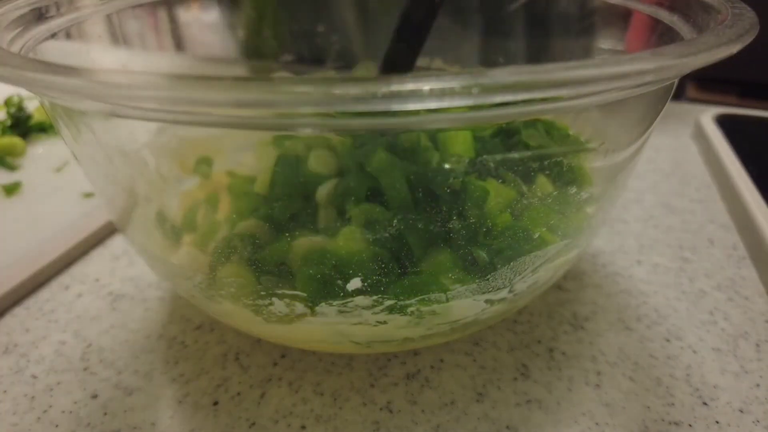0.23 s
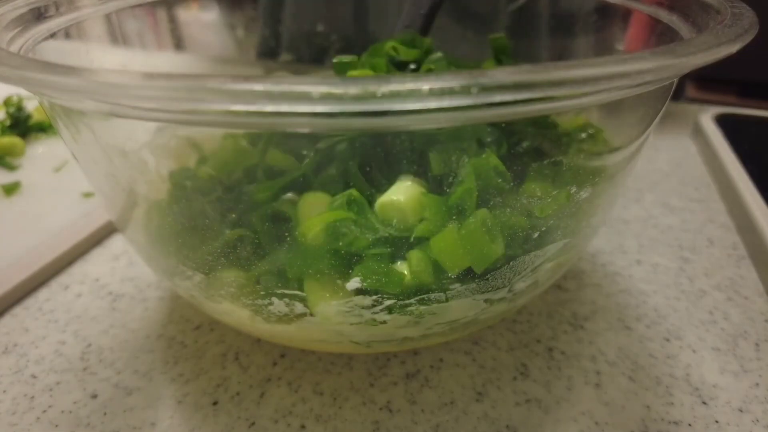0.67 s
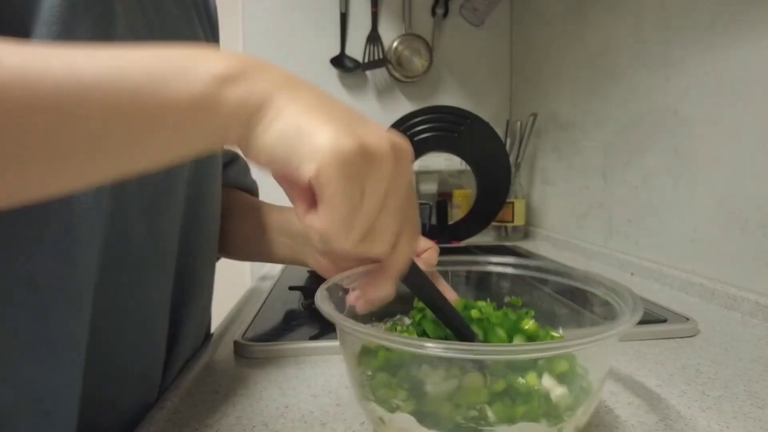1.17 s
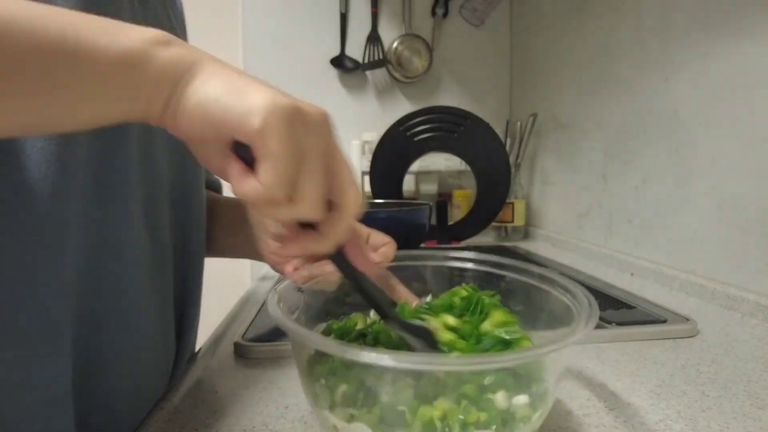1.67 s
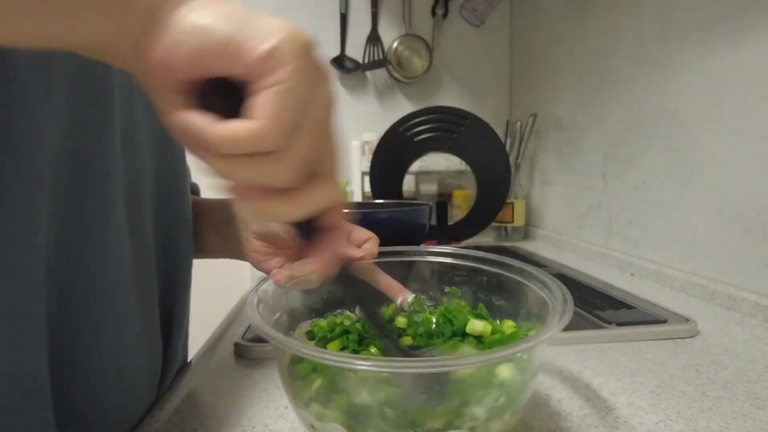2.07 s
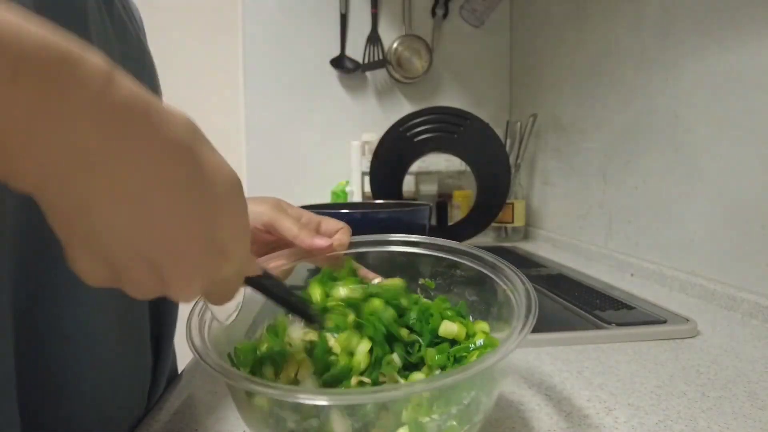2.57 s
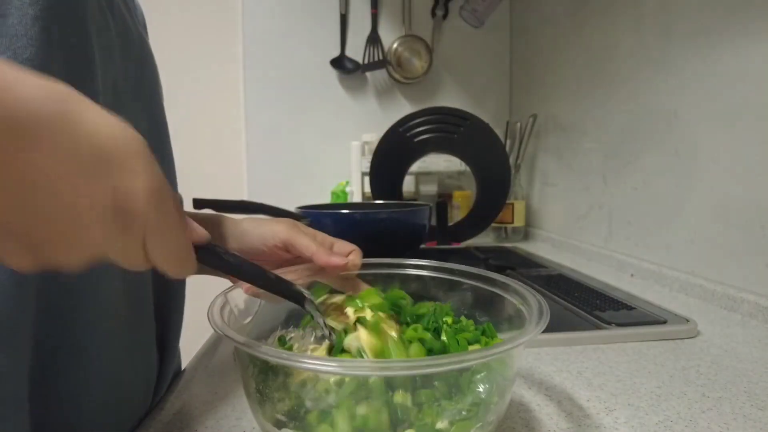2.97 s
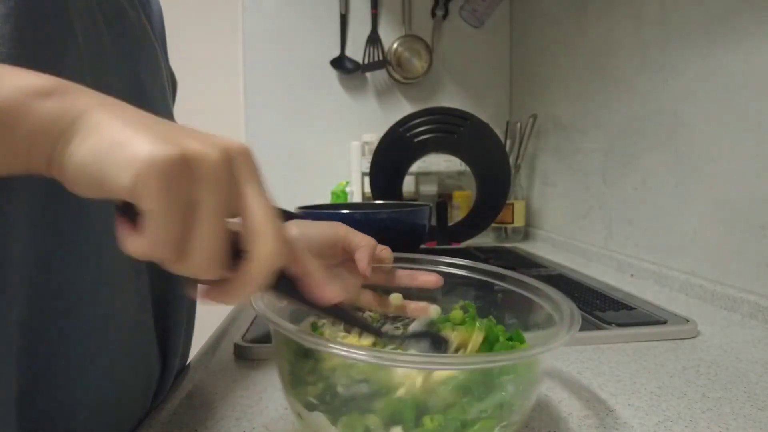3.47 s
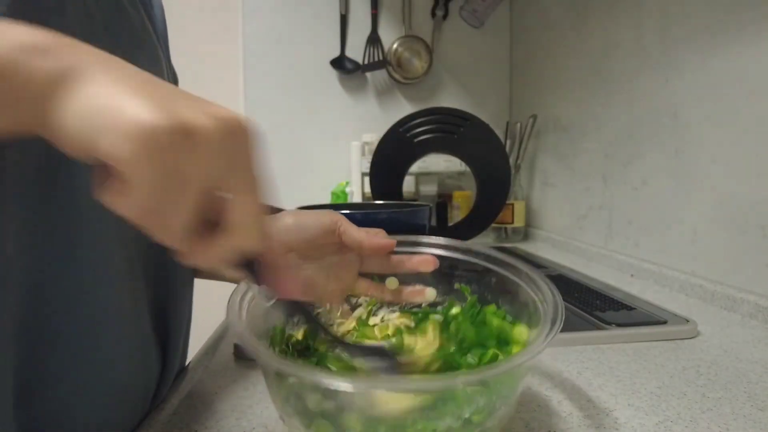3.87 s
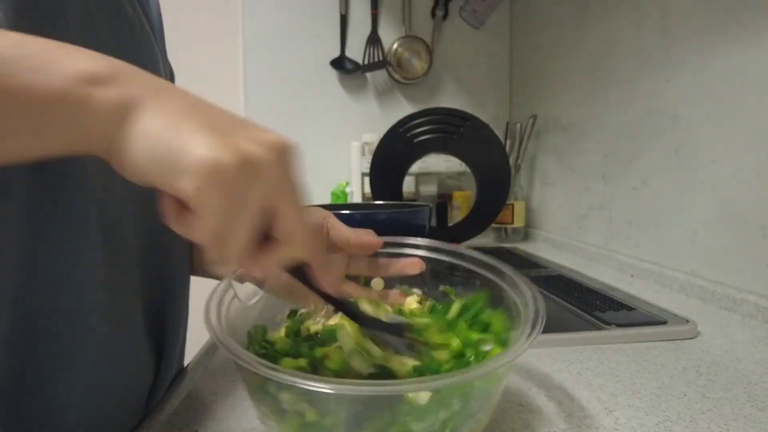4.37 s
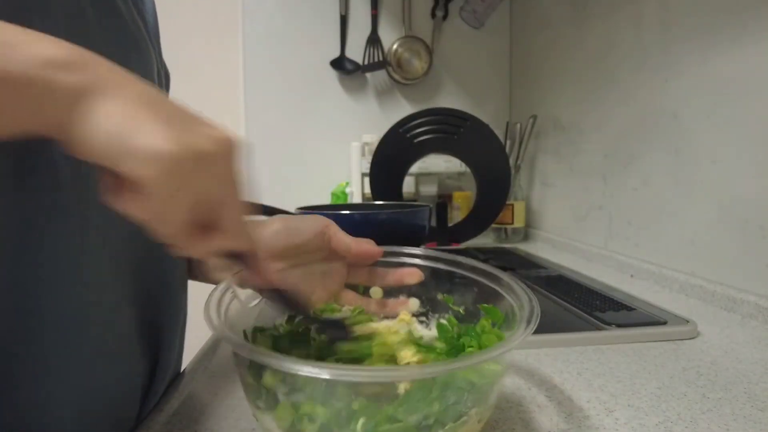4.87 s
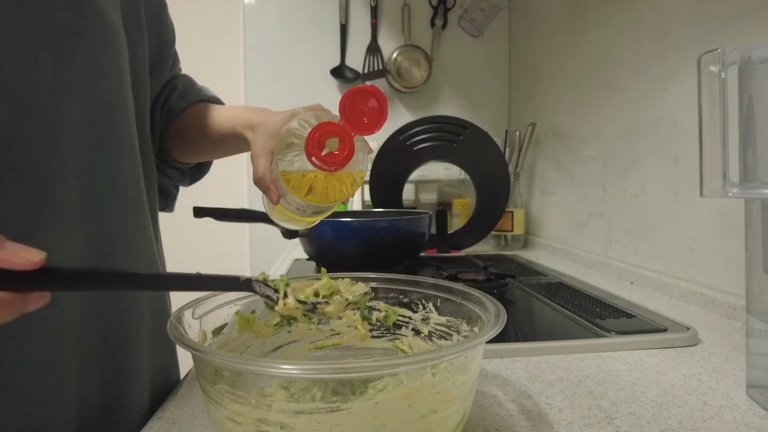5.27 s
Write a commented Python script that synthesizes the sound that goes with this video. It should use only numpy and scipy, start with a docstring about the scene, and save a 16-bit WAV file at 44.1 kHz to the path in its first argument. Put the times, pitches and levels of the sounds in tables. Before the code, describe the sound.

A close stereo kitchen sound of a spatula folding chopped greens into wet batter. It opens quietly with soft hush, dull rubbing and a barely perceptible high whine. Around 0.4-0.7 s a stroke brings low thuds, hollow bowl taps and squelchy smacks, then it settles, with small taps near 0.95 s and faint wet ticks. A hard cut at 1.2 s starts brisk stirring: a bowl knock, grainy mid-pitched scraping, sticky crackles and another tap at 1.75 s. From 2.4 to 3.3 s crisp leafy ticks and light slaps dot softer scraping; strokes grow steadier from 3.6 s. A sharp knock at 4.4 s and a much louder one at 4.7 s ring the damped bowl briefly and boom through the counter, with short room echo. Scraping and small smacks continue until 5.27 s, when all stirring stops dead, leaving very faint hush and low rumble to about 5.5 s.

```python
"""Folding greens into batter

A spatula folds chopped greens into wet batter in a bowl, close to a microphone on the same kitchen counter.
Coloured grainy noise is the scrape; short noise bursts are smacks, low thuds, slaps, pops and snapping greens.
Knocks ring decaying modes of bowl and counter under a noise crack; noise echoes add the room.
Three shots are joined by hard edits, each with its own hush level; a faint whine is in the first only."""
import sys
import numpy as np
from scipy import signal
from scipy.fft import rfft, irfft
from scipy.io import wavfile
from scipy.ndimage import uniform_filter1d

SR = 44100
rng = np.random.default_rng(int(sys.argv[2]) if len(sys.argv) > 2 else 0)


def dump_mix(stems):
    """Bounce the given channels to the path in sys.argv[1] as a 16-bit WAV at rate SR."""
    frames = np.atleast_2d(stems).T  # one column per channel
    limited = np.clip(frames, -1, 1)  # hard clip at full scale
    pcm = np.round(limited * 32767).astype(np.int16)
    wavfile.write(sys.argv[1], SR, pcm)


N = 242991
EDITS_S = 1.227, 5.271


def undb(db):
    """Decibels to gain."""
    return 10 ** (np.asarray(db) / 20)


def decay(t, t60_s):
    """Envelope that falls 60 dB in t60_s, at least 2 ms."""
    return np.exp(-np.log(1000) * t / np.maximum(t60_s, .002))


def peak(x, db):
    """Scale to a peak level."""
    return x * undb(db) / np.max(np.abs(x))


def rms_one(x):
    """Scale to rms 1 over all rows."""
    return x / np.sqrt(np.mean(x ** 2))


def lean(db):
    """Gains of the two ports for a level of left minus right."""
    return undb([[db / 2], [-db / 2]])


def add(out, s, sound):
    """Mix a short sound in at s seconds."""
    i = int(s * SR)
    out[:, i:i + sound.shape[-1]] += sound[..., :N - i]


def along(table, hz):
    """Value of a (Hz, value) table on a log-frequency axis."""
    table_hz, value = np.transpose(table)
    return np.interp(np.log(hz + 1), np.log(table_hz), value)


def colour(x, spectrum):
    """Shape a sound by a (Hz, dB) spectrum, silent outside it; rms 1."""
    hz = np.fft.rfftfreq(x.shape[-1], 1 / SR)
    inside = (hz > spectrum[0][0]) & (hz < spectrum[-1][0])
    return rms_one(irfft(rfft(x) * undb(along(spectrum, hz)) * inside, x.shape[-1]))


# Likeness of left and right. Each row: frequency in Hz, correlation from 0 to 1.
PORT_LIKENESS = [(60, 1), (290, 0.94), (640, 0), (1400, 0.61), (3100, 0.39), (6800, 0), (15000, 0.1)]


def pair(x):
    """Two microphone ports from two unrelated rows: mid and side shares set the correlation by frequency."""
    likeness = np.clip(along(PORT_LIKENESS, np.fft.rfftfreq(x.shape[-1], 1 / SR)), 0, 1)
    mid, side = rfft(x) * np.sqrt([1 + likeness, 1 - likeness]) / np.sqrt(2)
    return irfft(np.array([mid + side, mid - side]), x.shape[-1])


def walk(rate_hz):
    """Random levels held 1 / rate_hz s and slewed."""
    hold = max(int(SR / rate_hz), 2)
    steps = np.repeat(rng.standard_normal(N // hold + 1), hold)
    return 0.6 * uniform_filter1d(steps, hold)[:N]


def echo_tail(x, t60_s, db, lowpass_hz):
    """Diffuse echo: the mono sum through decaying noise, dulled above lowpass_hz, different at each port."""
    t = np.arange(int(SR * .9)) / SR
    onset = np.minimum(t / 0.0019, 1)
    echo = pair(rng.standard_normal((2, len(t)))) * decay(t, t60_s) * onset
    echo = signal.sosfilt(signal.butter(1, lowpass_hz, fs=SR, output="sos"), echo)
    echo = echo / np.sqrt(np.sum(echo ** 2) / 2)
    return undb(db) * signal.oaconvolve(x.mean(axis=0, keepdims=True), echo, axes=1)[:, :N]


HUSH_DB = -73.5, -81, -78.5  # one level per shot
# Spectrum of the room hush. Each row: frequency in Hz, level in dB per Hz.
HUSH_SPECTRUM = [(300, 11.5), (700, -10.5), (1300, -5.5), (4000, -11.5), (9000, -15.5), (16000, -23)]


def room_hush(t):
    """Steady coloured noise whose level steps at each edit."""
    noise = pair(rng.standard_normal((2, N)))
    return colour(noise, HUSH_SPECTRUM) * undb(HUSH_DB)[np.searchsorted(EDITS_S, t)]


WHINE_HZ, WHINE_RMS_DB = 12527, -99


def whine(t):
    """Faint pure tone in the first shot."""
    tone = np.sqrt(2) * np.sin(2 * np.pi * WHINE_HZ * t)
    return undb(WHINE_RMS_DB) * tone * (t < EDITS_S[0])


REST_RUB_DB = -74, -88.5, -81.5  # between pushes, one level per shot
# Pushes of the blade. Each row: peak time in seconds, rise and fall in seconds per 20 dB,
# scrape level in dB, treble spray level in dB, dull rub level in dB.
BLADE_PUSHES = [(0.0, .02, 0.095, -75.5, -87, -62), (0.15, 0.11, 0.16, -77.5, -81, -67),
                (0.439, 0.023, 0.19, -86, -67.5, -49.5), (0.546, 0.1, 0.15, -54.5, -59.5, -49.5),
                (1.07, 0.15, 0.14, -76, -76, -68), (1.23, 0.012, 0.049, -55, -74, -59),
                (1.287, 0.033, 0.15, -55.5, -52, -52.5), (1.45, 0.29, 0.17, -61, -62, -64),
                (1.731, 0.094, 0.14, -62.5, -63, -61.5), (1.81, 0.065, 0.094, -59, -59, -55),
                (1.95, 0.34, 0.26, -64, -71, -63.5), (2.14, 0.078, 0.31, -69.5, -73.5, -72),
                (2.32, 0.2, 0.13, -63, -59.5, -64.5), (2.46, 0.43, 0.19, -67.5, -63, -74),
                (2.64, 0.63, 0.38, -65.5, -63, -68), (2.84, 0.42, 0.44, -66.5, -69.5, -68),
                (3.23, 0.26, 0.47, -77, -75, -70), (3.58, 0.16, 0.44, -73, -63.5, -87),
                (3.717, 0.2, 0.15, -59.5, -65, -60), (3.99, 0.17, 0.16, -61, -64.5, -65),
                (3.86, 0.3, 0.11, -59.5, -63, -69), (4.169, 0.27, 0.38, -60, -60.5, -63.5),
                (4.46, 0.43, 0.8, -61.5, -59.5, -60.5), (4.651, 0.059, 0.48, -67, -59, -75),
                (4.681, 0.021, 0.09, -61, -57, -43), (4.82, 0.3, 0.2, -56.5, -66.5, -56),
                (5.05, 0.4, 0.41, -56.5, -59, -59.5), (5.24, 0.14, 0.12, -59.5, -59.5, -62.5)]


def pushes():
    """Gains of scrape, spray and rub: each push swells and fades evenly in dB; powers add."""
    s, rise_s, fall_s, scrape_db, spray_db, rub_db = np.transpose(BLADE_PUSHES)[:, :, None]
    t = np.arange(0, N, 32) / SR
    shot = np.searchsorted(EDITS_S, t)
    own_shot = shot == np.searchsorted(EDITS_S, s)  # a push is heard in its own shot only
    before = (s - t) / np.maximum(rise_s, .005)
    after = (t - s) / np.maximum(fall_s, .02)
    slope = np.where(t < s, before, after)
    scrape, spray, rub = (np.sum(undb(db - 20 * slope) ** 2 * own_shot, axis=0)
                          for db in (scrape_db, spray_db, rub_db))
    rub = rub + undb(REST_RUB_DB)[shot] ** 2
    return [np.interp(np.arange(N) / SR, t, np.sqrt(power)) for power in (scrape, spray, rub)]


def grains(per_s, spread_db):
    """Noise studded with soft slips of uneven size, each fading with a 3 ms time constant."""
    size = undb(spread_db * np.minimum(rng.exponential(size=N), 3))
    slips = (rng.random(N) < per_s / SR) * size
    fade = np.exp(-np.arange(600) / (.003 * SR))
    return rng.standard_normal((2, N)) * (1 + signal.oaconvolve(slips, fade)[:N])


# Bowl modes, damped by hand and batter. Each row: frequency in Hz, level in dB, t60 in seconds.
BOWL_MODES = [(360, -5, .05), (425, -3, .05), (500, -6, .03), (570, -2, .04), (640, 0, .045),
              (695, -3, .04), (850, -12, .03), (965, -6, .04), (1150, -12, .025), (1335, -3, .045),
              (1460, -3, .04), (1660, -5, .03), (1800, -5, .03), (1900, -7, .03), (2050, -7, .03),
              (2250, -9, .025), (2450, -8, .025), (2750, -10, .02), (3050, -12, .02), (3400, -14, .015),
              (4300, -17, .012)]


def through_bowl(x, share):
    """Rubbing on the wall keeps the bowl's modes humming: one resonance per mode added; rms 1."""
    f = np.fft.rfftfreq(N, 1 / SR)
    hum = sum(1 / (1 + 1j * (f - hz) * 2 * np.pi * t60_s / np.log(1000)) for hz, _, t60_s in BOWL_MODES)
    return rms_one(irfft(rfft(x) * (1 + share * hum), N))


def patchy(x, rate_hz, patchy_db):
    """Third-octave bands swell and fade each on their own, as wet spots catch and let go."""
    octave = np.log2(np.fft.rfftfreq(N, 1 / SR) + 1)
    spectrum, out = rfft(x), 0
    for centre in np.arange(8, 14.3, 1 / 3):
        share = np.clip(1 - 3 * np.abs(np.clip(octave, 8, 14) - centre), 0, 1)
        out = out + irfft(spectrum * share, N) * undb(patchy_db * walk(rate_hz))
    return out


# Spectra of blade scrape, treble spray and dull rub. Each row: frequency in Hz, level in dB per Hz.
SCRAPE_SPECTRUM = [(590, -36.5), (1000, -9), (1110, -10), (1260, 0), (2350, -3), (2960, -4.5),
                   (3770, -14.5), (5000, -19.5), (6500, -22.5), (11000, -120)]
SPRAY_SPECTRUM = [(2650, -6), (4500, -10.5), (6320, -10.5), (8460, -15), (11400, -19), (14600, -16.5),
                  (16000, -17)]
RUB_SPECTRUM = [(150, -22), (250, 4), (361, -10), (420, -7.5), (482, -6.5), (847, -10), (1200, -19.5),
                (1560, -62.5), (2640, -120)]


def stirring(scrape_gain, spray_gain, rub_gain):
    """Blade and greens slide over the bowl wall: grainy noise in three colours, partly through the bowl."""
    jerk = walk(22)  # the blade never slides evenly
    scrape = through_bowl(colour(pair(grains(150, 0.33)), SCRAPE_SPECTRUM), 0.17)
    scrape = scrape * scrape_gain * undb(1.2 * jerk)
    spray = colour(pair(grains(17, 1.0)), SPRAY_SPECTRUM)
    spray = spray * spray_gain * undb(1.8 * jerk + 0.94 * walk(60))
    rub = through_bowl(colour(pair(grains(54, 2.0)), RUB_SPECTRUM), 0.85)
    rub = rub * rub_gain * undb(0.44 * jerk)
    return patchy(scrape + spray + rub, rate_hz=45, patchy_db=4.0)


FIRST_SHOT_PITCH = 1.366  # frequency ratio: the rumble sits higher in the first shot
# Rumble level. Each row: time in seconds, level in dB.
RUMBLE_LEVEL = [(0, -54.5), (.1, -58.5), (.41, -60.5), (.55, -44.5), (.7, -54), (1.201, -59), (1.3, -48),
                (1.5, -51.5), (1.7, -61), (1.8, -47), (1.9, -56), (2.08, -60), (2.15, -50.5), (2.32, -53),
                (2.45, -57), (3.0, -58.5), (3.45, -59.5), (3.7, -47), (3.8, -54.5), (4.2, -52.5),
                (4.33, -57.5), (4.55, -48), (4.82, -40), (5.081, -51), (5.26, -58.5), (5.28, -63),
                (5.51, -62)]
# Rumble spectrum. Each row: frequency in Hz, level in dB per Hz.
RUMBLE_SPECTRUM = [(11, -26), (18, 3), (49, 1), (91, 1.5), (107, 2), (124, -10), (154, -9.5), (188, -8.5),
                   (231, -18.5), (280, -29), (320, -36), (420, -27), (700, -120)]


def counter_rumble(t):
    """Hand and bowl rock the counter: low coloured noise with a wandering level."""
    level_db = np.interp(t, *np.transpose(RUMBLE_LEVEL)) + 1.1 * walk(29)
    noise = pair(rng.standard_normal((2, N)))
    first = colour(noise, [(hz * FIRST_SHOT_PITCH, db) for hz, db in RUMBLE_SPECTRUM])
    later = colour(noise, RUMBLE_SPECTRUM)
    return np.where(t < EDITS_S[0], first, later) * undb(level_db)


SCATTER_DB = 3.5  # spread of left minus right, by chance


def bursts(rows):
    """Short band-passed noise rings, each started by a snap; rows: s, peak dB, centre Hz, width, ring s."""
    out, t = np.zeros((2, N)), np.arange(SR // 8) / SR
    for s, db, hz, width, ring_s in rows:
        burst = rng.standard_normal(len(t)) * decay(t, ring_s)
        burst[0] = 5.4 * np.sign(burst[0])  # the snap
        edge = 1 + np.clip(width, .03, 2) / 2
        band = signal.butter(2, [hz / edge, min(hz * edge, 20000)], "bandpass", fs=SR, output="sos")
        pan_db = SCATTER_DB * rng.standard_normal()
        add(out, s, peak(signal.sosfilt(band, burst), db) * lean(pan_db))
    return out


POPS_PER_S, POP_OVER_SCRAPE_DB, POP_HZ, POP_SPREAD_OCTAVES = 90, 2, 2740, 0.75


def crackle(scrape_gain):
    """Small pops at random times up to the last edit; their peaks follow the scrape."""
    rows = []
    for s in np.cumsum(rng.exponential(size=700)) / POPS_PER_S:
        size, pitch = rng.standard_normal(2)
        if s < EDITS_S[1]:
            scrape_db = 20 * np.log10(scrape_gain[int(s * SR)] + 1e-9)
            hz = min(POP_HZ * 2 ** (POP_SPREAD_OCTAVES * pitch), 14000)
            rows.append((s, scrape_db + POP_OVER_SCRAPE_DB + 2.0 * size, hz, .3, .012))
    return bursts(rows)


# Short noise bursts. Each row: start in seconds, peak in dB, centre in Hz, width as share of centre,
# ring t60 in seconds.
NOISE_BURSTS = [(0.1114, -60, 1500, 0.26, 0.06), (0.15, -59.5, 472, 0.11, 0.026),
                (0.427, -38, 208, 0.48, 0.05), (0.489, -47, 222, 0.79, 0.032),
                (0.497, -35, 198, 0.56, 0.04), (0.574, -44.5, 190, 0.48, 0.036),
                (0.671, -44.5, 223, 0.67, 0.022), (0.44, -43.5, 490, 0.26, 0.028),
                (0.453, -47.5, 890, 0.97, 0.028), (0.475, -47.5, 2280, 0.3, 0.027),
                (0.477, -42.5, 830, 0.15, 0.07), (0.502, -42.5, 810, 0.3, 0.02),
                (0.543, -42.5, 1960, 0.41, 0.036), (0.5686, -47, 2080, 0.1, 0.021),
                (0.588, -54, 2300, .3, .015), (0.5956, -48, 2550, 0.17, .035),
                (0.631, -48, 710, 0.32, 0.032), (0.672, -57, 476, 0.17, 0.1),
                (0.9434, -47, 2145, 0.092, 0.019), (0.946, -59, 1660, 0.15, 0.04),
                (0.955, -56, 668, 0.12, 0.12), (0.956, -59, 900, 0.074, 0.18), (0.99, -58, 670, .15, 0.07),
                (1.012, -67, 885, 0.11, 0.04), (1.0405, -63, 2080, 0.18, .03),
                (1.052, -59, 720, 0.15, 0.067), (1.061, -60, 1350, .15, 0.024),
                (1.097, -48, 2230, 0.16, 0.051), (1.103, -61, 1580, .15, 0.033),
                (1.343, -55, 3200, 0.088, 0.034), (1.468, -55, 1850, 0.29, 0.061),
                (1.508, -61, 1320, 0.2, 0.067), (1.422, -54, 1290, 0.37, .04),
                (1.703, -54, 2030, 0.39, .04), (1.7922, -52, 3970, 0.25, 0.057),
                (1.9063, -51, 1740, 0.37, 0.047), (2.126, -50.5, 2210, 0.43, 0.045),
                (2.46, -53.5, 2220, 0.28, 0.033), (2.55, -50, 3080, 0.84, .04),
                (2.616, -47.5, 4340, 0.42, 0.025), (2.734, -54.5, 575, 0.4, 0.032),
                (2.817, -41.5, 1880, 0.49, 0.083), (2.816, -44, 710, 0.77, 0.05),
                (2.836, -51.5, 1630, 0.15, 0.046), (2.903, -61.5, 606, 0.5, 0.055),
                (3.214, -55.5, 4850, .32, .028), (3.62, -54.5, 500, 0.67, 0.025),
                (3.754, -46, 1270, 0.18, 0.096), (3.855, -52.5, 2580, 0.26, 0.074),
                (4.005, -54, 680, 0.24, 0.091), (4.0962, -51.5, 1510, 0.29, 0.07),
                (4.172, -51, 2800, 0.29, .035), (4.639, -43, 3570, 1, .012), (4.687, -25, 643, 0.19, 0.036),
                (4.691, -21, 1640, 0.27, 0.0084), (4.8847, -47, 1640, .47, 0.07),
                (4.893, -50.5, 645, 0.17, 0.037), (5.005, -43, 620, 0.23, 0.039),
                (5.256, -45, 340, 1, 0.043), (5.03, -49.5, 3000, 0.31, 0.09)]


def smacks_thuds_slaps():
    """Short noise bursts: wet smacks, low thuds and slaps within knocks."""
    return bursts(NOISE_BURSTS)


CRACK_T60_S, CRACK_SIDE_SHARE = .0055, .6
SPLASH_DB, SPLASH_T60_S = -20, 0.18  # batter and greens thrown about after the crack
# Spectrum of crack and splash. Each row: frequency in Hz, level in dB per Hz.
CRACK_SPECTRUM = [(2000, -1.5), (3800, -10), (6100, -8), (8100, -14.5), (11000, -17), (16000, -31)]


def contact_crack(t):
    """Coloured noise with a fast decay for the contact and a slow one for the splash."""
    noise = rng.standard_normal((2, len(t))) * [[1], [CRACK_SIDE_SHARE]]
    fade = decay(t, CRACK_T60_S) + undb(SPLASH_DB) * decay(t, SPLASH_T60_S)
    return colour(pair(noise), CRACK_SPECTRUM) * fade


MODE_SPREAD_RAD = .8  # spread of a mode's phase between the ports


def bowl_ring(t, soft_ms):
    """Decaying sines at the bowl's modes, roughened; a softer contact loses the upper modes."""
    hz, db, t60_s = np.transpose(BOWL_MODES)[:, :, None]
    sign, level, detune, phase = rng.standard_normal((4, len(BOWL_MODES), 1))  # every spot mixes modes anew
    gain = np.sign(sign) * undb(db + 3.0 * level) / (1 + (hz * soft_ms / 500) ** 4)
    turn = 2 * np.pi * hz * (1 + 0.018 * detune) * t
    ring = np.array([np.sum(gain * np.sin(turn + port * MODE_SPREAD_RAD * phase) * decay(t, t60_s), axis=0)
                     for port in (-.5, .5)])
    # the wet blade chatters against the wall
    chatter = uniform_filter1d(rng.standard_normal(len(t)), size=30) * np.sqrt(30)
    return ring * (1 + .5 * chatter)


# Counter top modes. Each row: frequency in Hz, level in dB, t60 in seconds, side it first moves to as a sign.
COUNTER_MODES = [(56, -5.5, .15, 1), (91, -13.5, .26, -1), (92, 0, .036, -1), (122, -16.5, .27, 1),
                 (145, -12.5, .32, -1), (165, -3.5, .046, 1), (171, -21, .4, 1), (231, -14, .09, -1),
                 (275, -10, .092, 1), (294, -13.5, .114, -1), (378, -23, .06, -1), (210, -27, .3, 1),
                 (283, -30, .35, 1), (358, -29, .35, -1), (425, -33, .25, 1)]


def counter_thump(t):
    """Decaying sines at the counter's modes."""
    return sum(side * undb(db) * np.sin(2 * np.pi * hz * t) * decay(t, t60_s)
               for hz, db, t60_s, side in COUNTER_MODES)


THUMP_LEAD_S, THUMP_LEAN_DB = .0025, -.5  # the counter yields before the crack; left minus right
# Knocks. Each row: time in seconds, peaks of bowl ring, counter thump and crack in dB,
# softness of the contact in ms.
BOWL_KNOCKS = [(0.427, -44.5, -42, -75, 0.58), (0.49, -34, -44.5, -47, 0.39), (0.543, -39, -49, -65, 0.23),
               (0.629, -42.5, -50, -83, 0.13), (0.942, -45.5, -40, -81, 0.43),
               (1.268, -30, -32.5, -35.5, 0.14), (1.742, -33.5, -41, -50, 0.92),
               (2.127, -54.5, -68, -67, 0.11), (2.705, -42.5, -49.5, -68, 0.31),
               (2.815, -40.5, -54.5, -47.5, 0.049), (2.9, -45.5, -52, -70, 0.17),
               (3.59, -49.5, -66, -71, 0.21), (3.736, -36.5, -67, -69, 0.072), (3.981, -44, -54, -62, 0.24),
               (4.3694, -22.5, -14.5, -22.5, 0.27), (4.684, -15.5, -6.5, -10.5, 0.32),
               (4.892, -44, -76, -55, 0.095), (5.004, -43, -55, -66, 0.44), (5.257, -39, -32, -49, 0.87)]


def knocks():
    """Each blow pushes the bowl's and the counter's modes and cracks at the contact."""
    air, wood, t = np.zeros((2, N)), np.zeros((2, N)), np.arange(SR // 2) / SR
    thump = counter_thump(t)
    for s, bowl_db, thump_db, crack_db, soft_ms in BOWL_KNOCKS:
        add(air, s, peak(bowl_ring(t, soft_ms), bowl_db) + peak(contact_crack(t), crack_db))
        add(wood, s - THUMP_LEAD_S, peak(thump, thump_db) * lean(THUMP_LEAN_DB))
    return air, wood


TICK_WIDTH, TICK_RING_S = 0.75, 0.0096  # width as share of centre
# Crisp ticks. Each row: start in seconds, peak in dB, centre in Hz.
GREENS_TICKS = [(1.065, -56, 3300), (1.067, -55, 6400), (1.7305, -64, 2180), (2.39, -43, 6900),
                (2.5373, -46, 15200), (2.569, -46.5, 7340), (2.6375, -44.5, 6960), (2.6457, -45, 6000),
                (2.63, -46, 1650), (2.646, -50, 3100), (2.707, -52, 6500), (2.892, -54, 7500),
                (2.815, -50, 3300), (2.9143, -49, 1950), (2.9766, -53, 1800), (3.0877, -65, 2610),
                (3.124, -59, 2250), (3.255, -50.5, 2430), (3.5916, -46.5, 2430), (3.9815, -58, 3400),
                (4.4308, -37.5, 2300)]


def ticks():
    """Greens snap in wide, dry noise bursts."""
    return bursts([(s, db, hz, TICK_WIDTH, TICK_RING_S) for s, db, hz in GREENS_TICKS])


ROOM_T60_S, ROOM_DB, ROOM_LOWPASS_HZ = 0.25, -8, 3250
ROOM_FROM_HZ = 560  # the room's echo of the bowl is thin below this
FLOOR_T60_S, FLOOR_DB, FLOOR_LOWPASS_HZ = 0.4, -37, 220  # slow low boom of cabinet and room
BURST_SEND_DB = -1  # bursts reach the room less than knocks do


def scene():
    """All layers; blows, bursts and their echoes stop dead at the last edit."""
    t = np.arange(N) / SR
    gains = pushes()
    short = crackle(gains[0]) + smacks_thuds_slaps() + ticks()
    air, wood = knocks()
    sent = air + undb(BURST_SEND_DB) * short
    thin = signal.sosfilt(signal.butter(2, ROOM_FROM_HZ, "highpass", fs=SR, output="sos"), sent)
    room = echo_tail(thin, ROOM_T60_S, ROOM_DB, ROOM_LOWPASS_HZ)
    boom = echo_tail(wood, FLOOR_T60_S, FLOOR_DB, FLOOR_LOWPASS_HZ)
    blows = (air + short + room + wood + boom) * (t < EDITS_S[1])
    return blows + stirring(*gains) + counter_rumble(t) + room_hush(t) + whine(t)


LEAN_DB = -.6  # left minus right: the bowl sits a little to the right
TOP_HZ = 15780


def record(dry):
    """Lean the ports to the right and cut the top with a steep low-pass."""
    return signal.sosfilt(signal.ellip(10, .2, 80, TOP_HZ, fs=SR, output="sos"), dry * lean(LEAN_DB))


dry = scene()
out = record(dry)
dump_mix(out)
```